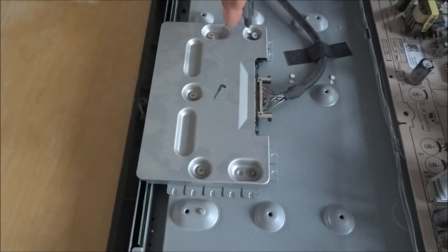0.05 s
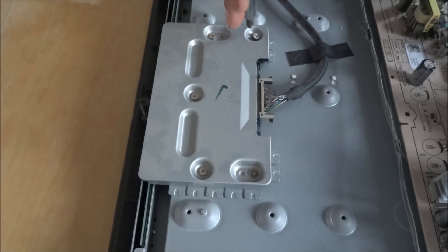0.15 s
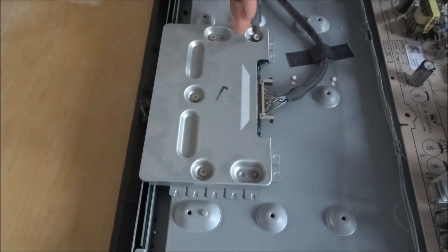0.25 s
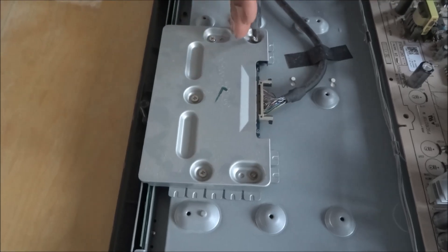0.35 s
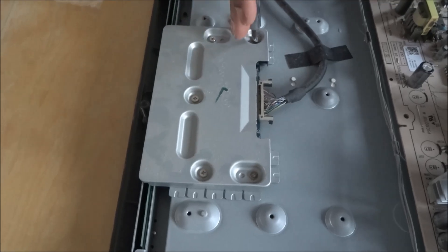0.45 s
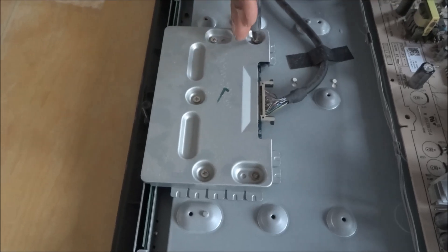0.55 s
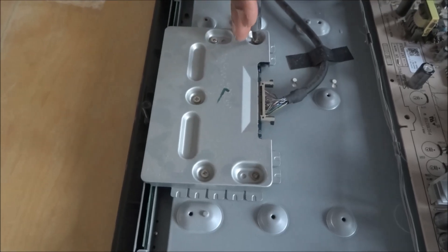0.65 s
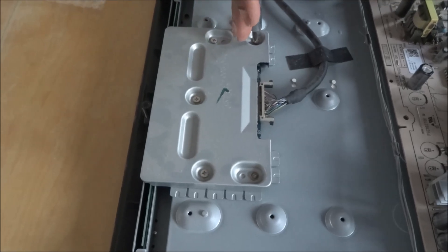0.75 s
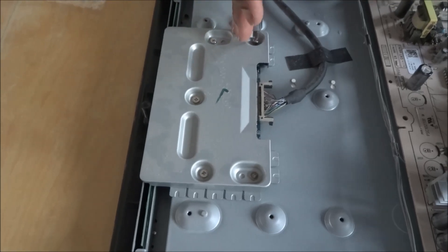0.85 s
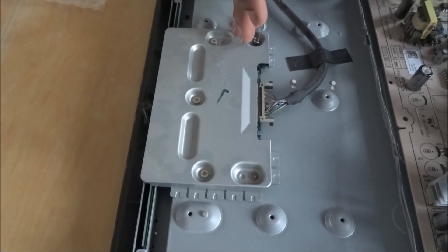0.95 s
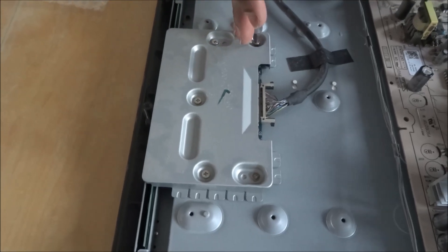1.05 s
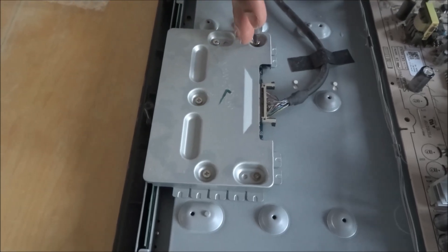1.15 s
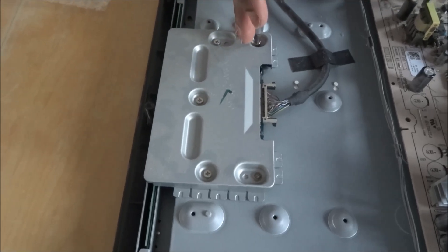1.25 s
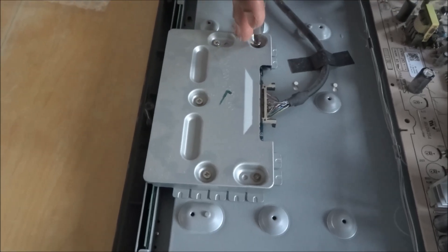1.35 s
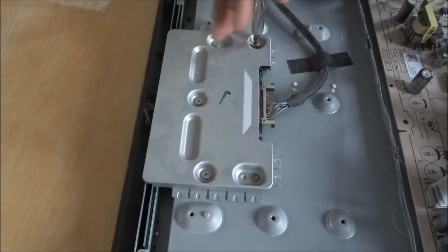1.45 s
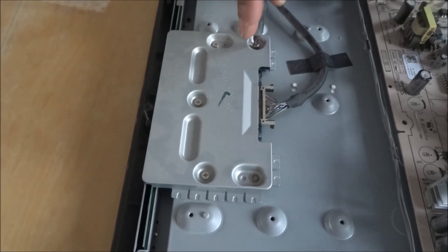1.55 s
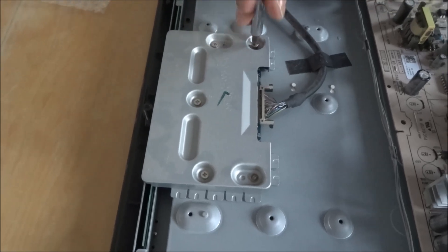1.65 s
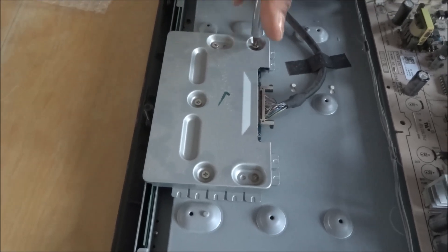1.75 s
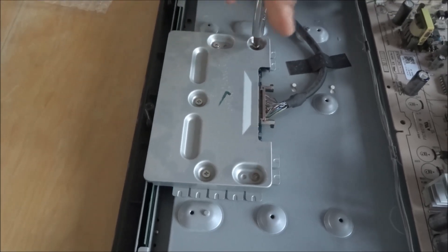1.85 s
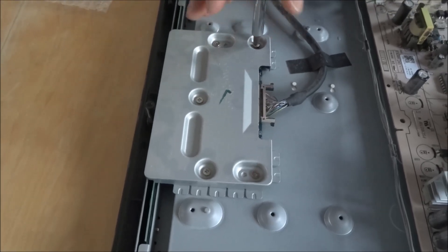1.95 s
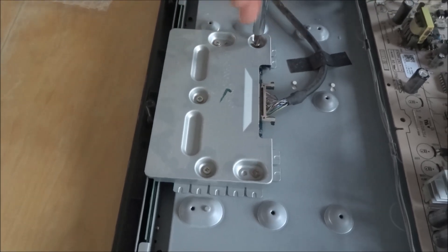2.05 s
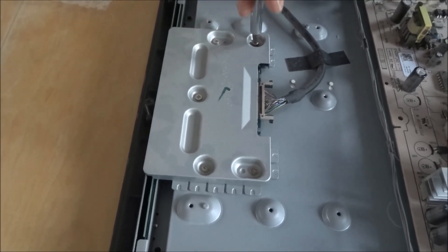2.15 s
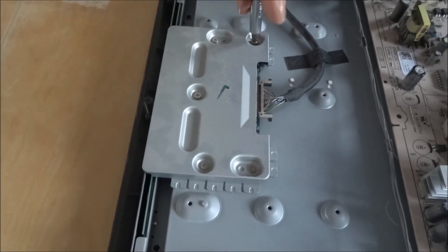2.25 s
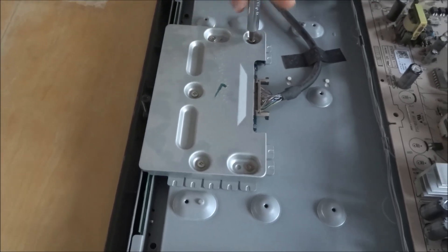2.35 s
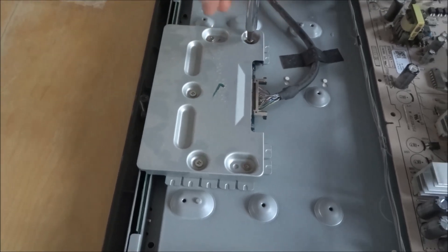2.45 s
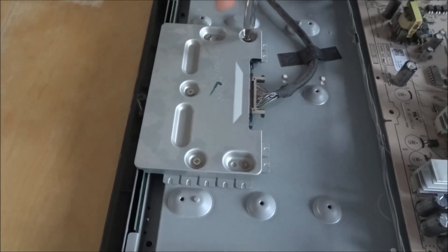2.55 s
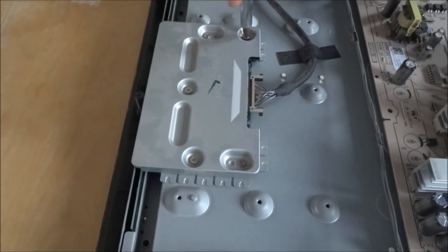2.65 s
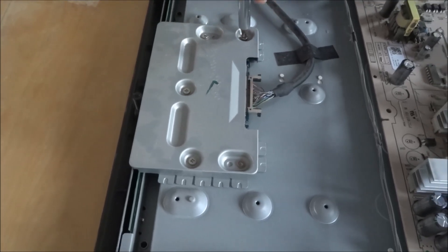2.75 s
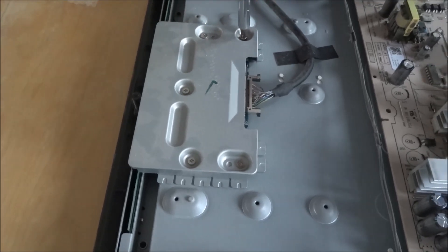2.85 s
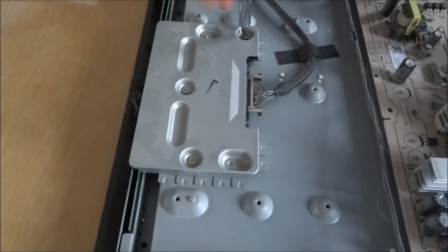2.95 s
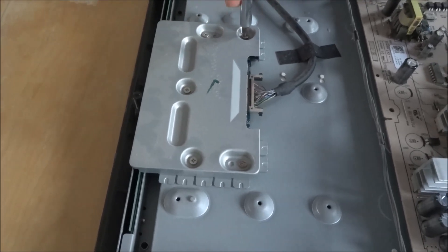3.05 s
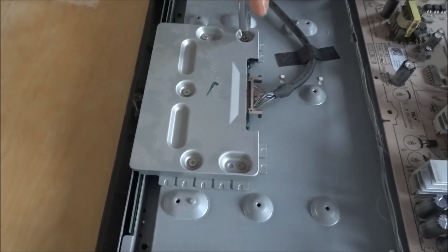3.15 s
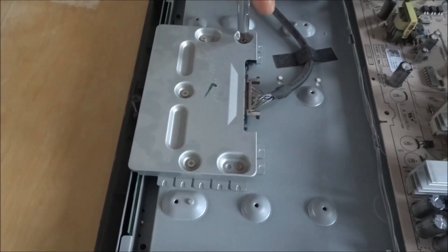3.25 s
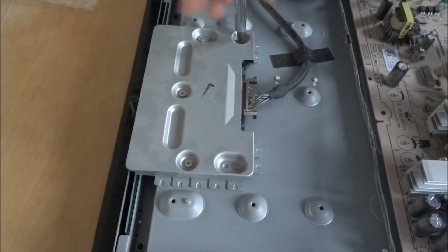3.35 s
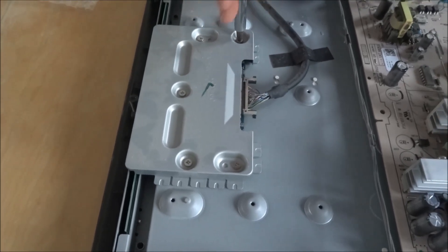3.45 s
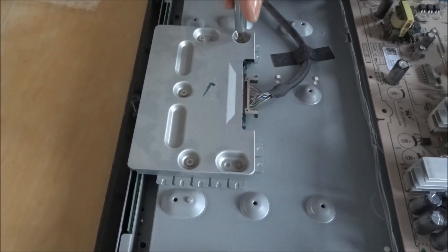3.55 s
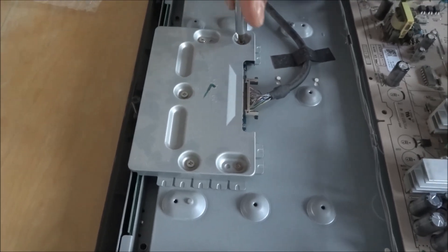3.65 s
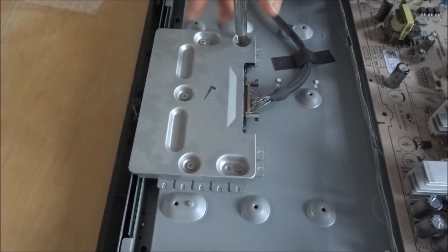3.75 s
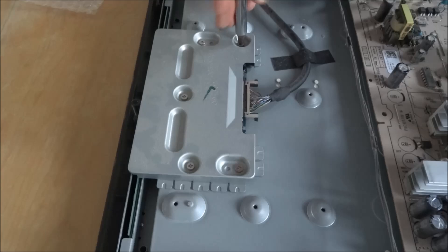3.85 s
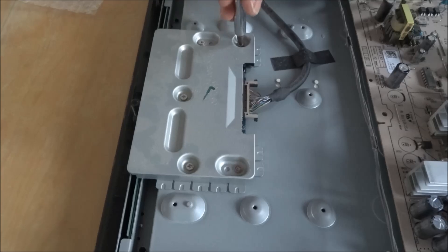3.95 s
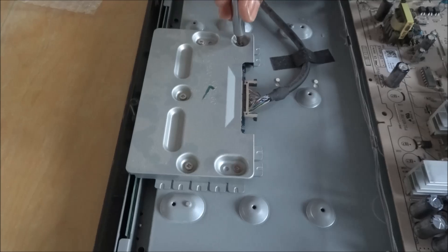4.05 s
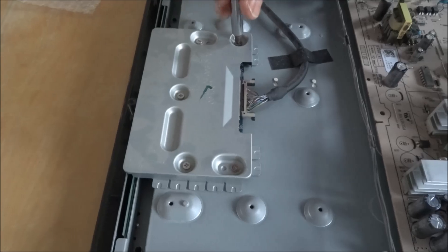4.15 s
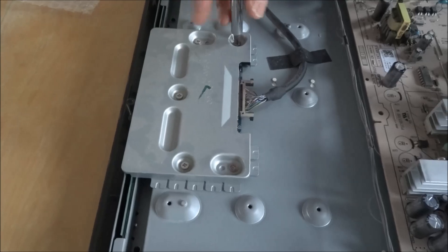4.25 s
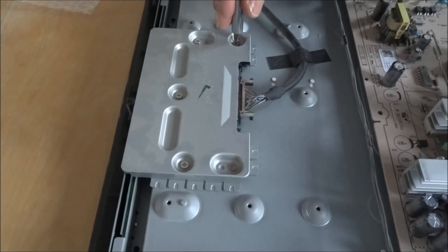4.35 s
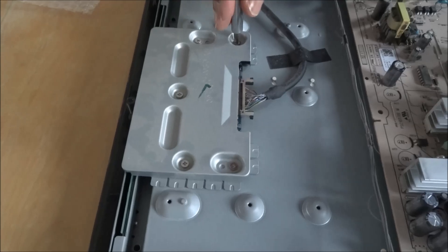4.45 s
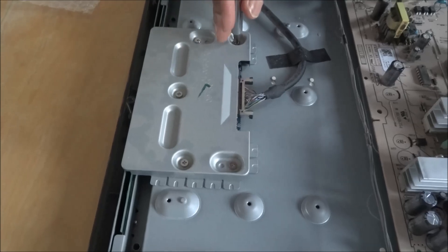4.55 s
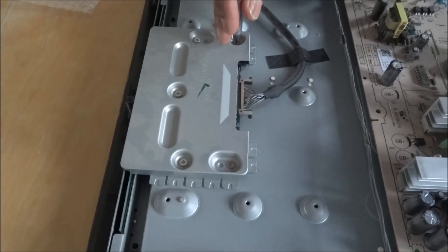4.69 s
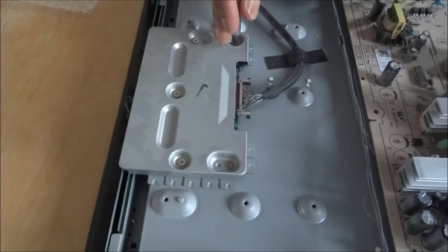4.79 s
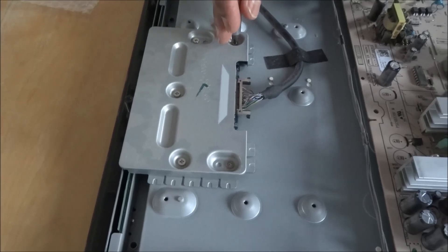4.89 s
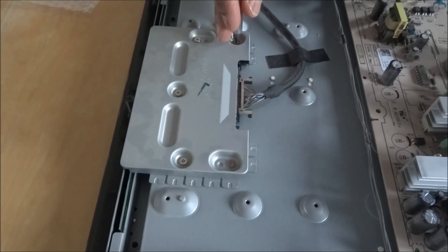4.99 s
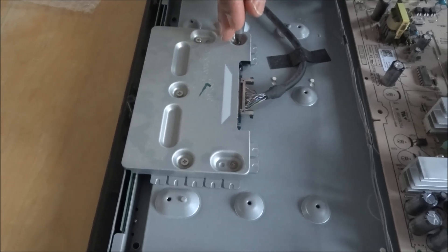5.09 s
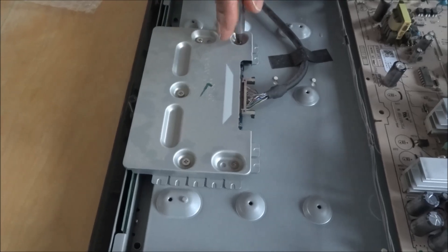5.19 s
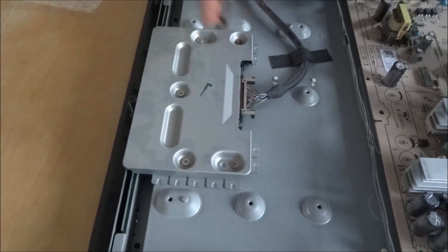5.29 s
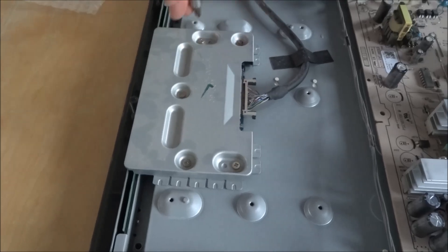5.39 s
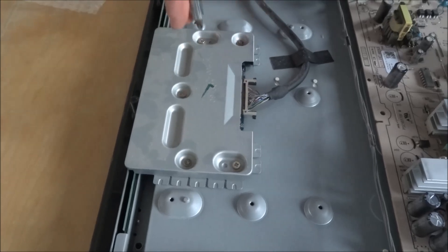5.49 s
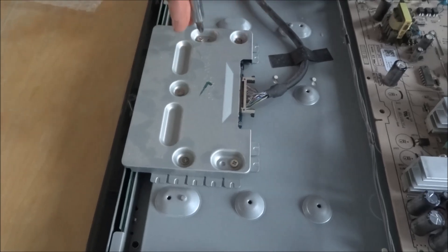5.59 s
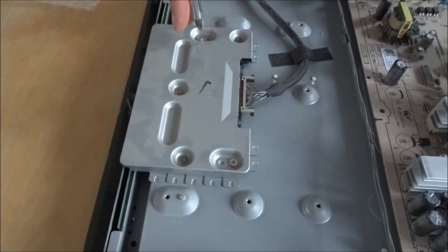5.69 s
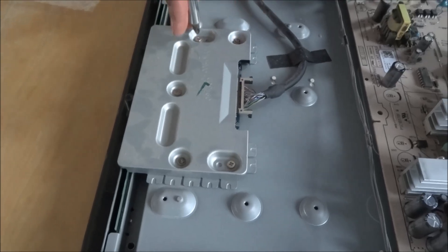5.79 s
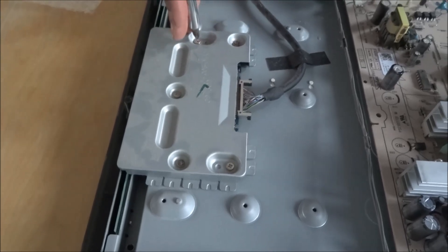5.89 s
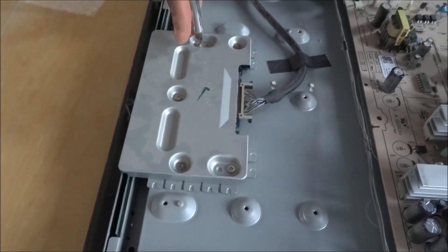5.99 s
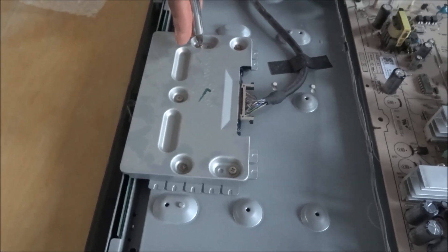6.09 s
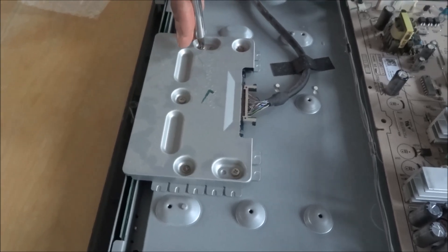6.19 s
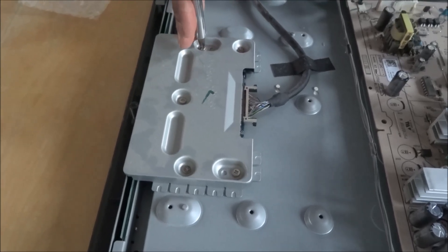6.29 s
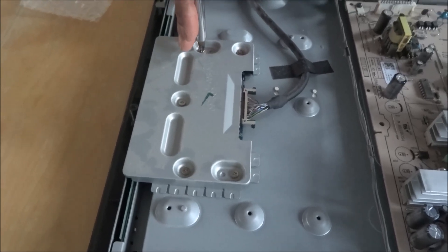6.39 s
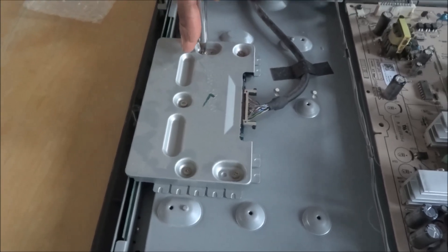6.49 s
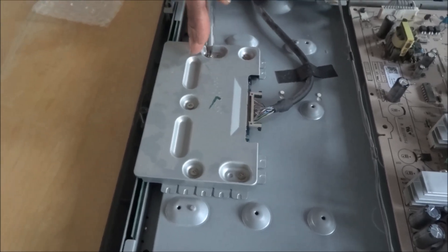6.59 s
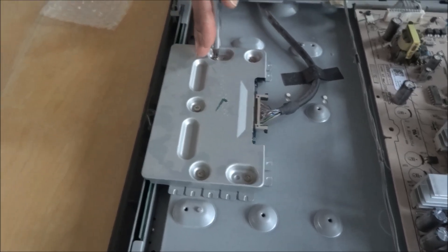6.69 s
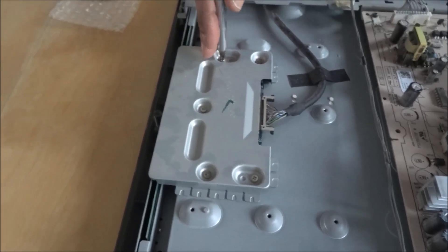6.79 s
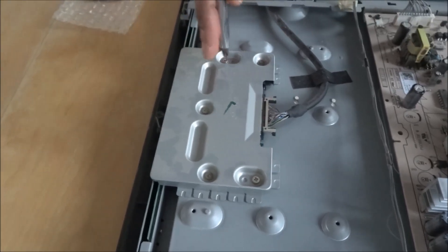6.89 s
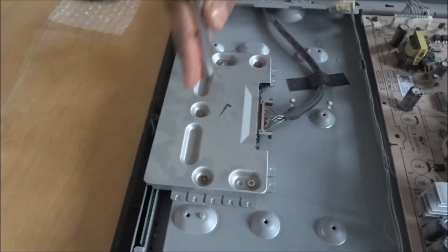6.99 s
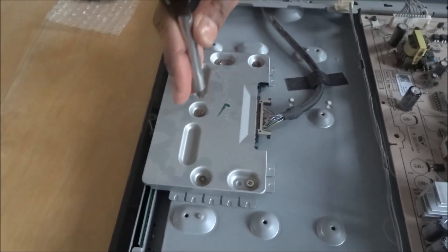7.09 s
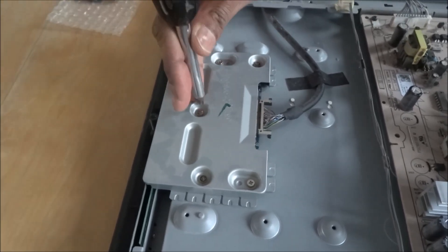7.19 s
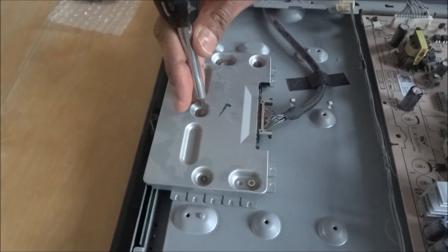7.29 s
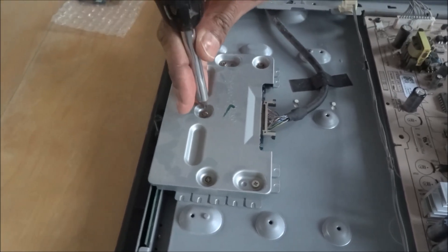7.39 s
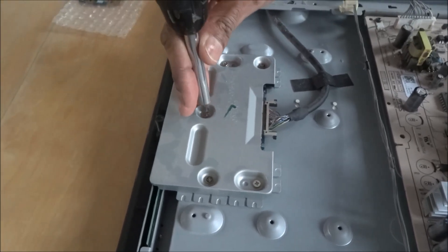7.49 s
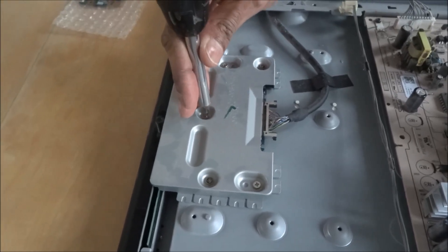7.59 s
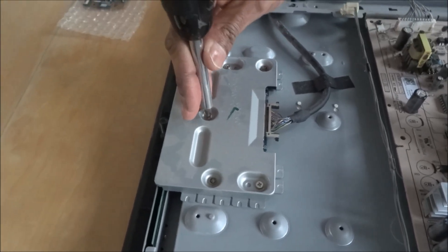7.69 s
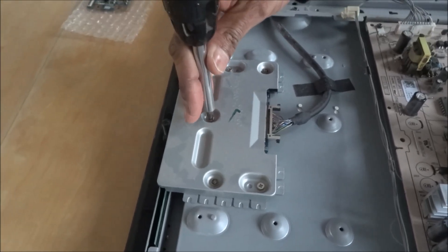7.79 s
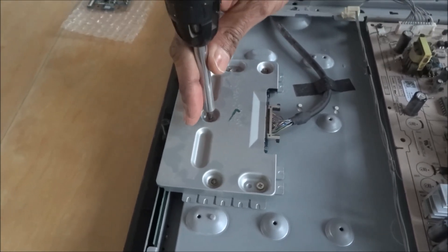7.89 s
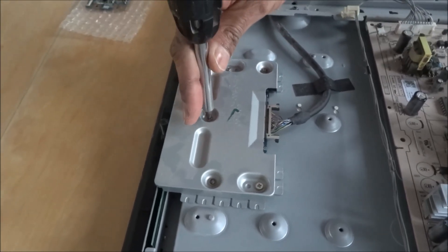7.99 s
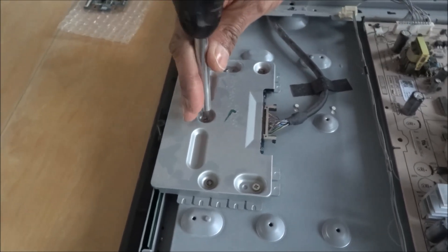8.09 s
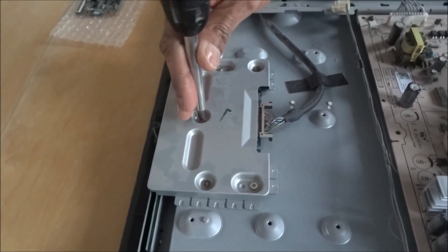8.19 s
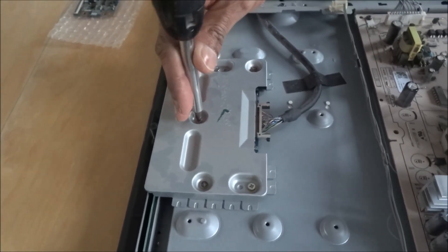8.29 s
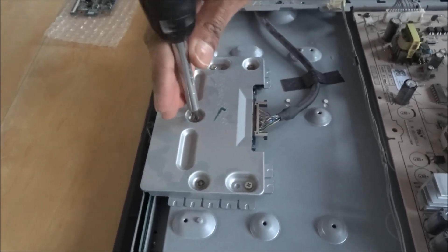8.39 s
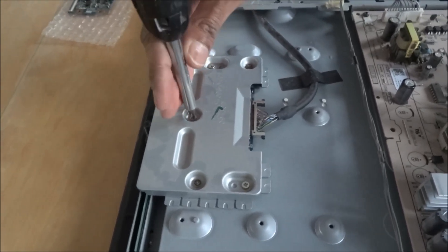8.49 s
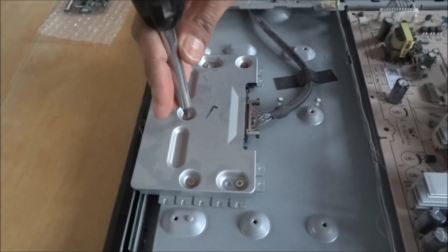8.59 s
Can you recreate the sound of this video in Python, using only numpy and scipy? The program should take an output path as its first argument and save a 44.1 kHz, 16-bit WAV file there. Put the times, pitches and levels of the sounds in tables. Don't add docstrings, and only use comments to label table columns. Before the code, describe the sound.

A hand ratchet screwdriver clicks in seven short runs, its steel bit ticking and clanking on thin metal over a low booming panel.

```python
import sys
import numpy as np
from scipy import signal
from scipy.fft import rfft, irfft, next_fast_len
from scipy.io import wavfile
from scipy.ndimage import uniform_filter1d

SR = 44100
rng = np.random.default_rng(int(sys.argv[2]) if len(sys.argv) > 2 else 0)


def wav_record(signal):
    frames = np.transpose(np.atleast_2d(signal))
    bounded = np.clip(frames, -1, 1)
    quanta = np.round(bounded * 32767).astype(np.int16)
    wavfile.write(sys.argv[1], SR, quanta)


def volts(x):
    e = np.asarray(x, float) / 20
    return 10 ** e


N = 381024
CUTOFF_HZ = 16600

# frequency in Hz, level in dB, t60 in seconds.
PAWL_MODES = [(2830, -6, .01), (3300, -10, .007), (4000, -17, .005), (5180, 1, .012), (5700, -3, .009),
              (6500, -3, .007), (7650, 5, .011), (8200, -5, .006), (9140, -7, .006), (10700, -5, .006),
              (11900, -8, .005)]
# frequency in Hz, level in dB, t60 in seconds.
PLATE_TREBLE_MODES = [(1870, -5, .02), (2150, -4, .025), (2350, -5, .02), (2800, -6, .018),
                      (3150, -6, .018), (3500, -9, .014)]
# frequency in Hz, level in dB, t60 in seconds.
PLATE_MIDDLE_MODES = [(635, -5, .04), (700, -7, .03), (775, -6, .035), (883, -9, .03), (1135, -9, .03),
                      (1550, -8, .03)]


def rms_one(x):
    return x / np.sqrt(np.mean(x ** 2) + 1e-20)


def at_hz(points, hz):
    points = np.array(points)
    return np.interp(np.log(hz), np.log(points[:, 0]), points[:, 1])


def blows(s, db, bounces_s, loss_db):
    delay = np.array(bounces_s) * rng.uniform(.7, 1.3, (len(s), len(bounces_s)))
    size = volts(np.asarray(db)[:, None] - loss_db * np.arange(len(bounces_s)))
    at = ((np.asarray(s)[:, None] + delay) * SR).astype(int)
    return np.minimum(at, N - 1), size


def strike(modes, at, size, spread_db, soft_hz):
    out = np.zeros((2, N))
    luck = rng.standard_normal(size.shape + (len(modes), 2))
    mode_db = np.array(modes)[:, 1]
    share = volts(spread_db * luck[..., 0] + mode_db)
    share *= np.linalg.norm(volts(mode_db)) / np.linalg.norm(share, axis=-1, keepdims=True)
    for k, (hz, db, t60) in enumerate(modes):
        force = np.full(N, 1e-18)
        np.add.at(force, at, size * share[..., k] * np.sign(luck[..., k, 1]))
        pole, w = volts(-60 / (t60 * SR)), 2 * np.pi * hz / SR
        rung = signal.lfilter([0, np.sin(w)], [1, -2 * pole * np.cos(w), pole * pole], force)
        out += rung * volts(.9 * (-1) ** k * np.array([[1], [-1]]))
    r = np.exp(-2 * np.pi * soft_hz / SR)
    return signal.lfilter([1 - r], [1, -r], out)


def crack(at, size, t60, low_hz, high_hz, apart_db):
    force = np.full(N, 1e-18)
    np.add.at(force, at, size)
    tail = signal.lfilter([1], [1, -volts(-60 / (t60 * SR))], force)
    mid, side = tail * rng.standard_normal((2, N))
    band = signal.butter(3, [low_hz, high_hz], "band", fs=SR, output="sos")
    return signal.sosfilt(band, volts(-2.5) * force + mid + volts(apart_db) * side * [[1], [-1]])


def scatter(x, spread_hz, rate_hz):
    drift = signal.lfilter(*signal.butter(2, rate_hz, fs=SR), rng.standard_normal(N))
    wander_hz = spread_hz * rms_one(drift)
    turning = np.exp(2j * np.pi * np.cumsum(wander_hz) / SR)
    return np.real(signal.hilbert(x, next_fast_len(N))[..., :N] * turning)


def coloured(spectrum):
    # frequency in Hz, likeness from 0 to 1.
    likeness = [(60, 0.98), (240, 0.99), (950, 0.6), (3770, 0.6), (15000, 1)]
    hz = np.maximum(np.fft.rfftfreq(N, 1 / SR), 1)
    mid, side = rfft(rng.standard_normal((2, N))) * volts(at_hz(spectrum, hz))
    alike = np.clip(at_hz(likeness, hz), 0, 1)
    return rms_one(irfft(np.sqrt(1 + alike) * mid + np.sqrt(1 - alike) * side * [[1], [-1]], N))


def background():
    # frequency in Hz, level in dB per Hz.
    hum_colour = [(20, -5), (40, -17.5), (80, -11), (130, -5), (200, -5), (300, -12.5), (1000, -22),
                  (3300, -42)]
    # frequency in Hz, level in dB per Hz.
    hiss_colour = [(880, -37), (1500, -10.5), (2160, -0.5), (2410, -2.5), (3000, -2), (4160, -7),
                   (10200, -9), (16000, -19)]
    # frequency in Hz, width in Hz, level relative to the hum in dB.
    standing_waves = [(157, 2.5, -6), (134.5, 4, -12), (190, 4, -14), (240, 5, -17)]
    # time in seconds, gain in dB.
    gain_curve = [(0, -6), (.8, -2.5), (1.6, 1), (2.1, -1.5), (3, -2.5), (3.999, -1.5), (4.8, -5),
                  (5.899, -5), (6.699, -1), (8.1, 0.5), (8.64, -2)]
    s, gain_db = np.transpose(gain_curve)
    hum_db = -39.5 + 0.62 * gain_db
    hiss_db = -52.5 + gain_db
    t, hum = np.arange(N) / SR, coloured(hum_colour)
    for hz, width_hz, db in standing_waves:
        r = np.exp(-np.pi * width_hz / SR)
        resonance = [1, -2 * r * np.cos(2 * np.pi * hz / SR), r * r]
        wave = signal.lfilter([1, 0, -1], resonance, rng.standard_normal(N))
        hum = hum + volts(db) * rms_one(wave)
    hiss = coloured(hiss_colour)
    return volts(np.interp(t, s, hum_db)) * hum + volts(np.interp(t, s, hiss_db)) * hiss


def appliance():
    first_s, every_s, on_s, mains_hz = .09, 1.061, .42, 99.9
    t = np.arange(N) / SR
    on = uniform_filter1d(1. * ((t - first_s) % every_s < on_s), size=1500)
    mains = volts(-41.5) * np.sin(2 * np.pi * mains_hz * t)
    octave = volts(-54) * np.sin(4 * np.pi * mains_hz * t)
    return on * (mains + octave)


def taps():
    # time in seconds, tick in dB, bluntness in dB
    bit_taps = [(0.5087, -36.5, 8.5), (0.5197, -26, -2), (0.9039, -27, 6), (0.922, -15, -10),
                (0.9344, -45, 3.5), (0.9847, -29.5, -12), (1.007, -28.5, -4), (1.0226, -28.5, -1.5),
                (1.0442, -27.5, -17), (1.067, -13, -2), (1.0729, -15, -1.5), (1.0894, -53, 1.5),
                (1.142, -34, -1.5), (1.1498, -21, -8), (1.1603, -15.5, -4), (1.188, -28, -15),
                (1.217, -33.5, -13), (1.249, -35, -10), (1.282, -36.5, -7.5), (1.3385, -7.5, 1.5),
                (1.6304, -15, -18),
                (1.915, -5.5, -14.5), (1.9872, -12, -6.5), (2.018, -14.5, -5), (2.092, -29, -16),
                    (2.11, -32, -7), (2.39, -16, -10), (2.4154, -3.5, -8.5), (2.4615, -21.5, 0.5),
                    (2.4954, -9, -7), (2.6296, -44, 14), (2.6469, -19, -4), (2.868, -28.5, 3),
                    (2.8843, -13.5, -9.5), (2.893, -15, -17), (3.0596, -25, -11.5), (3.3247, -18.5, -2),
                    (3.4685, -39.5, 4), (3.5547, -4, -18), (3.7943, -25.5, -10.5), (3.892, -39, -25),
                    (3.931, -36, -7.5), (3.943, -30, -2), (4.1915, -35.5, 8), (4.201, -12, -7),
                    (4.206, -13.5, -9.5), (4.3299, -27.5, -22), (4.336, -27, 6), (4.392, -24.5, -6.5),
                    (4.4422, -28, -14),
                (4.4878, -12, 0.5), (4.4944, -33, 15), (4.5005, -21, 5), (4.533, -19, -20),
                    (4.542, -12, -25), (4.7194, -47, 15.5), (4.749, -15, -16), (4.779, -26.5, -30),
                    (5.0654, -32.5, 1), (5.077, -9.5, -19), (5.111, -25, -14), (5.2587, -32, -7.5),
                    (5.289, -25.5, -22), (5.4177, -35, -9.5), (5.489, -33.5, -32), (5.7595, -47, 6.5),
                (6.079, -37.5, 18), (6.0924, -46, -9), (6.155, -44, 10), (6.1774, -36.5, 9.5),
                       (6.194, -32, 8.5), (6.2057, -16, 1.5), (6.3509, -12, -0.5), (6.3644, -49, 5),
                       (6.383, -35, 6), (6.575, -14.5, -5.5), (6.8728, -19.5, -4), (7.0074, -18, -44),
                       (7.553, -13.5, 2.5), (7.7225, -30, 10), (7.7381, -10.5, 2), (7.752, -28, -6),
                       (7.8404, -22.5, -6), (7.9287, -28, -11), (8.045, -35, -2), (8.08, -23, -37),
                       (8.444, -28.5, -2.5), (8.4645, -22, -3), (8.496, -19, -30), (8.528, -25, 0.5),
                       (8.5697, -35, -15), (8.607, -39.5, 7)]
    # time in seconds, peak in dB.
    play_knocks = [
        (1.6719, 2),
        (1.689, 3.5),
        (1.989, -7),
        (2.39, -12),
        (3.941, -19),
        (4.749, -6.5),
        (6.576, -30),
    ]
    # frequency in Hz, level in dB, t60 in seconds.
    shaft_modes = [(1140, -1, .03), (1278, 4, 0.028), (1335, 3, .025), (1380, 7, 0.032)]
    # time in seconds, peak in dB.
    shaft_clanks = [(0.517, -33), (0.932, -33), (1.022, -34), (1.067, -24), (1.0864, -32), (1.149, -30.5),
                    (1.1608, -29.5), (1.341, -15), (4.486, -17), (7.5534, -20.5), (7.724, -29.5),
                    (7.732, -19.5), (7.741, -12), (7.841, -25.5), (8.0448, -34), (8.5277, -32.5)]

    s, db, blunt_db = np.transpose(bit_taps)
    at, size = blows(s, db, [0, .0015, .004], loss_db=6)
    tick = crack(at, size, 0.0082, 2500, 11000, apart_db=-15.0)
    duller = signal.butter(2, 8500, fs=SR, output="sos")
    tick = signal.sosfilt(duller, tick)

    at, size = blows(s, db + 0.87 * blunt_db, [0, .002, .005], loss_db=6)
    treble = strike(PLATE_TREBLE_MODES, at, size * volts(-2.1), spread_db=7.5, soft_hz=8250)
    treble += crack(at, size * volts(3.5), 0.019, 940, 4890, apart_db=-16.5)

    at, size = blows(s, db + 1.53 * blunt_db, [0, .003, .008], loss_db=9.5)
    middle = strike(PLATE_MIDDLE_MODES, at, size * volts(-7.0), spread_db=-3.0, soft_hz=5000)
    middle += crack(at, size * volts(-0.5), 0.12, 250, 1600, apart_db=-16.5)

    s, db = np.transpose(play_knocks)
    at, size = blows(s, db, [0, .002], loss_db=3)
    knocks = strike(PAWL_MODES[:2], at, size, spread_db=3.0, soft_hz=9000)
    s, db = np.transpose(shaft_clanks)
    at, size = blows(s, db + 1.5, [0, .004], loss_db=23.0)
    clanks = strike(shaft_modes, at, size, spread_db=2.5, soft_hz=5040)
    return tick + knocks + treble + middle + clanks


def loads():
    # time in seconds, boom in dB, upper panel modes in
    # relative dB, bench in relative dB.
    panel_pushes = [(0.519, -16, -3, -16.5), (0.908, -11.5, -11, -8), (.937, -18.5, -1, -10.5),
                    (1.006, -17.5, -10, -4), (1.071, -14.5, -1.5, -7), (1.146, -17, -1, -0.5),
                    (1.168, -9.5, -14, -27.5), (1.3, -26, -8, 0.5), (1.35, -8.5, -4.5, -12),
                    (1.639, -42.5, -3, -4), (1.665, -12.5, -1.5, -8), (4.192, -15, -10.5, -4.5),
                    (4.334, -14, -20, -11), (4.444, -44, 4, -6.5), (4.487, -12, 2.5, -9.5),
                    (4.503, -0.5, -10, -12), (4.746, -22, -9, -37), (4.973, -28, -12, -6),
                    (5.084, -25, -4, -3), (5.259, -22, -13, -4), (5.376, -30.5, -22.5, 2),
                    (6.079, -10, -4.5, -15), (6.092, -17, 0.5, -30), (6.189, -16, 2, -15),
                         (6.351, -8.5, -1.5, -25), (6.365, -26.5, 4.5, -29), (6.532, -23, -7, -8),
                         (6.571, -24.5, 0.5, -2.5), (6.871, -32.5, -0.5, -9), (7.551, -12.5, -3.5, -26),
                         (7.723, -15.5, 1.5, -22), (7.747, -10, 3, -13.5), (7.841, -8, -18.5, -8.5),
                         (8.445, -20, -3, -14), (8.53, -24, 8, -2.5)]
    # time in seconds, boom in dB, boom t60 in seconds.
    hand_leans = [
        (1.924, -18.5, 0.4),
        (2.217, -23, 0.44),
        (2.398, -19.5, 0.45),
        (2.768, -25.5, 0.79),
        (2.868, -21.5, 0.3),
        (3.206, -24, 0.59),
        (3.249, -21.5, 0.4),
        (3.558, -24, 0.34),
        (3.657, -19.5, 0.37),
        (3.949, -25, 0.26),
    ]
    # start in seconds, favoured upper mode in Hz, boom t60 in seconds.
    bit_places = [
        (0, 316, 0.25),
        (1.05, 265, 0.48),
        (4.1, 387, 0.31),
        (5.9, 311, 0.27),
        (7.3, 379.6, 0.15),
    ]
    from_s, place_hz, place_t60 = np.transpose(bit_places)
    leaning = [(s, db, -5, -40.5) for s, db, _ in hand_leans]
    s, db, upper_db, bench_db = np.transpose(panel_pushes + leaning)
    place = np.maximum(np.searchsorted(from_s, s) - 1, 0)
    t60 = np.append(place_t60[place][:-len(hand_leans)], np.transpose(hand_leans)[-1])
    favoured_hz = place_hz[place] * np.exp(.1 * rng.standard_normal(len(s)))
    return s, db, upper_db, bench_db, favoured_hz, t60


def pushes():
    # frequency in Hz, level in dB, t60 in seconds.
    panel_modes = [(303, -7, .1), (345, -8, .055), (385, -7, .055), (435, -6, .06), (470, -9, .05),
                   (540, -9, .05)]
    # frequency in Hz, level in dB, t60 in seconds.
    bench_modes = [(76, -28, 0.19), (135, -3, 0.3), (156, -20, 0.19)]
    # frequency in Hz, level in dB, t60 in seconds.
    flank_modes = [(210.7, -46, 0.18), (236.2, -10, 0.38)]
    boom_hz, lead_rad = 215.9, 0.033
    s, db, upper_db, bench_db, place_hz, t60 = loads()
    t, power = np.arange(N) / SR, np.zeros(N)
    for start, top, ring in zip(s, volts(db + 2.0), t60):
        i, age, rise = int(start * SR), t[:SR], 0.0034 / np.sqrt(top)
        swell = top * (1 - np.exp(-age / rise)) * volts(-60 * age / ring)
        power[i:i + SR] += (swell ** 2)[:N - i]
    boom = np.sqrt(power) * np.sin(2 * np.pi * boom_hz * t + lead_rad * np.array([[1], [-1]]))

    at, size = blows(s, db, [0], loss_db=0)
    flanks = strike(flank_modes, at, size, spread_db=-17.0, soft_hz=298)

    at, size = blows(s, db + upper_db, [0, .009], loss_db=3.5)
    upper = crack(at, size, 0.093, 200, 1110, apart_db=-27.5)
    for mode in panel_modes:
        near = volts(-16 * np.abs(np.log2(mode[0] / place_hz)))[:, None]
        force = size * near * volts(rng.normal(5.8, 2.9, size.shape))
        upper = upper + strike([mode], at, force, spread_db=0, soft_hz=1510).mean(axis=0)

    at, size = blows(s, db + bench_db + 0.5, [.004], loss_db=0)
    bench = strike(bench_modes, at, size, spread_db=-3.5, soft_hz=608)
    return boom, flanks + upper + bench


def scrapes():
    # start in seconds, length in seconds, level in dB.
    slides = [(0.909, 0.045, -31.5), (0.998, 0.036, -53), (1.049, 0.025, -35), (1.965, 0.045, -35.5),
              (2.401, 0.12, -36), (1.141, 0.038, -39), (1.349, .1, -43), (2.622, 0.053, -40.5),
              (3.07, 0.014, -45), (3.497, 0.013, -46), (4.317, 0.044, -33.5), (4.497, 0.045, -40),
              (6.171, .09, -36), (6.853, 0.036, -40), (7.223, 0.078, -53.5), (7.701, 0.056, -35.5),
              (8.039, 0.098, -42), (8.428, 0.03, -38.5), (8.462, 0.16, -48.5), (2.855, 0.044, -42),
              (4.188, 0.038, -34)]
    t, level = np.arange(N) / SR, np.zeros(N)
    for start, length, db in slides:
        level += volts(db) * np.sin(np.pi * np.clip((t - start) / length, 0, 1)) ** 2
    slips_per_s = 1500
    at = np.flatnonzero((rng.random(N) < slips_per_s / SR) & (level > 1e-9))
    size = level[at] * volts(0.74 * np.minimum(rng.exponential(1, N)[at], 5))
    modes = PLATE_TREBLE_MODES + PLATE_MIDDLE_MODES
    plate = strike(modes, at, size * volts(-2.0), spread_db=9.0, soft_hz=7000)
    return plate + crack(at, size * volts(-12.5), 0.023, 700, 13000, apart_db=-15.5)


def rings():
    # time in seconds, frequency in Hz, peak in dB, t60 in seconds.
    ringing_modes = [(0.911, 430, -26, 0.1), (1.17, 304, -19, .15), (1.338, 1524, -8, 0.021),
                     (1.339, 2300, -10, 0.014), (1.339, 3580, -17, 0.013), (1.351, 304, -16, .2),
                     (1.351, 435, -21, .12), (1.667, 306.4, -25, 0.17), (2.415, 442, -25.5, 0.16),
                     (2.4155, 5060, -6, .012), (2.4156, 1400, -21, 0.019), (4.325, 60.4, -24, 0.21),
                     (4.39, 1140, -33, 0.034), (4.487, 1245, -8, .02), (4.494, 1470, -7.5, 0.026),
                     (4.495, 3130, -16.5, .015), (4.505, 307, -13.5, 0.16), (4.505, 460, -20.5, 0.12),
                     (5.259, 292, -22.5, .1), (5.759, 2120, -34, 0.02), (5.759, 2830, -38, .02),
                     (6.082, 300, -27.5, .15), (6.082, 437, -20, .12), (6.092, 136.5, -29, 1),
                     (6.353, 309, -19, 0.16), (6.3653, 329, -9.5, 0.042), (6.0928, 342, -13.5, 0.044),
                     (7.553, 415.7, -9.5, 0.089), (7.555, 342, -12, 0.11), (7.554, 2290, -17, 0.027),
                     (7.552, 1350, -12, .02), (7.556, 1362, -28.5, .2), (7.562, 133.4, -25, 0.94),
                     (7.739, 2276, -19, .05), (7.741, 390, -6, .12), (7.745, 1387, -31.5, .2),
                     (7.745, 1290, -30, .2), (7.753, 2355, -18.5, .05), (7.841, 422, -6, 0.092),
                     (7.8418, 340, -8, 0.12), (7.841, 2290, -27.5, .04), (8.43, 52, -29.5, .3)]
    out = np.zeros(N + SR)
    for s, hz, db, t60 in ringing_modes:
        start = int(s * SR)
        age = np.arange(min(int(t60 * SR), SR)) / SR
        out[start:start + len(age)] += volts(db - 60 * age / t60) * np.sin(2 * np.pi * hz * age)
    return out[:N]


def squeaks():
    # start in seconds, length in seconds, frequency in Hz, level in dB.
    rubs = [(0.937, .03, 618, -33), (1.067, 0.071, 762, -25), (1.145, 0.039, 420, -19.5),
            (1.285, 0.092, 662, -33.5), (4.486, 0.016, 680, -10), (4.488, 0.045, 787, -18.5),
            (4.49, 0.029, 1153, -22), (5.071, 0.033, 756, -35.5), (5.745, 0.027, 1780, -50),
            (7.564, 0.057, 768, -23), (8.066, .05, 2200, -47)]
    t, out = np.arange(N) / SR, np.zeros(N)
    for start, length, hz, db in rubs:
        swell = np.sin(np.pi * np.clip((t - start) / length, 0, 1))
        out += volts(db) * swell * np.sin(2 * np.pi * hz * t)
    return scatter(out, spread_hz=25.2, rate_hz=64.0)


def teeth():
    # time in seconds, teeth per second.
    wrist_strokes = [
        [(1.6507, 85), (1.6981, 127), (1.7266, 80), (1.7793, 150), (1.8078, 59), (1.8441, 50)],
        [(2.1496, 61), (2.2167, 118), (2.2542, 96), (2.3055, 22)],
        [(2.6646, 44), (2.6924, 99), (2.712, 105), (2.7441, 145), (2.7887, 33)],
        [(3.0825, 76), (3.1188, 88), (3.1378, 125), (3.1731, 100), (3.2006, 117), (3.2236, 58)],
        [(3.5104, 53), (3.5881, 153), (3.6027, 120), (3.6288, 110), (3.6417, 46), (3.6824, 3)],
        [(3.9674, 85), (3.9947, 61), (4.0271, 62), (4.0904, 33)],
        [(4.5483, 28), (4.5835, 28)],
    ]
    stroke_levels = [-5.5, -5, -6, -7, -5.5, -6, -7.5]
    last_tooth_levels = [1.5, -3, -3, 1.5, 0, 1, -3.5]
    rows = []
    for stroke, level_db, last_db in zip(wrist_strokes, stroke_levels, last_tooth_levels):
        s, speed = np.transpose(stroke)
        t = np.linspace(s[0], s[-1], num=2000)
        turned = np.cumsum(np.interp(t, s, speed)) * (t[1] - t[0])
        tooth = np.linspace(turned[0], turned[-1], round(turned[-1]) + 1)
        when = np.interp(tooth, turned, t)
        slow = np.log2(100 * np.gradient(when))
        db = level_db + last_db * (when == when[-1])
        db = db + 1.1 * slow + 1.6 * rng.standard_normal(len(when))
        rows += zip(when, db, slow)
    return np.transpose(rows)


def ratchet():
    # time in seconds, low housing modes in dB, middle modes in dB.
    finger_grip = [(1.65, -10.5, 2), (1.69, 6.5, -2), (1.73, -8, -9.5), (1.775, -2, 1.5), (1.845, 0, 0.5),
                   (2.15, -4.5, -5.5), (2.19, 2.5, 3.5), (2.235, -1, -3), (2.305, -25.5, -6),
                   (2.665, -6, -8), (2.7, 0.5, 3.5), (2.73, 1, 1), (2.765, 0, 0.5), (2.79, -9.5, -9),
                   (3.082, -0.5, -5), (3.135, 2, -4.5), (3.16, -3, 1.5), (3.2, 0.5, -8.5),
                   (3.224, -2.5, -6), (3.51, 0, -13), (3.57, -0.5, -2.5), (3.62, -3, -2), (3.68, 1.5, -7),
                   (3.967, -3.5, 0.5), (4.03, -4.5, -7), (4.09, -4, -1), (4.548, -1.5, -0.5),
                   (4.584, 1.5, 3)]
    grip_hz, middle_hz = 3800, 6000
    alike = .6
    s, db, slow = teeth()
    held_s, low_db, middle_db = np.transpose(finger_grip)
    grip_db, middle_db = np.interp(s, held_s, low_db), np.interp(s, held_s, middle_db)
    at, size = blows(s, 0 * db, [0, .0006, .0013], loss_db=4.5)
    size = size * volts(-3.5 * np.maximum(slow, 0)[:, None] * np.arange(size.shape[1]))

    hz, mode_db, t60 = np.transpose(PAWL_MODES)[:, :, None]
    age = np.arange(600) / SR
    luck = rng.standard_normal(at.shape + (len(PAWL_MODES), 3))
    luck[..., :2] = signal.lfilter([np.sqrt(1 - alike ** 2)], [1, -alike], luck[..., :2], axis=0)
    mode_db = mode_db + grip_db[:, None, None, None] * (hz < grip_hz)
    mode_db = mode_db + middle_db[:, None, None, None] * ((hz > grip_hz) & (hz < middle_hz))
    shifted_hz = hz * (1 + 0.014 * luck[:, :1, :, :1])
    envelope = volts(mode_db + 2.85 * luck[..., 1:2] - 60 * age / t60)
    modes = envelope * np.sign(luck[..., 2:]) * np.sin(2 * np.pi * shifted_hz * age)
    housing = np.zeros((2, N))
    for side, lean_db in enumerate((1.3, -1.3)):
        lean = volts(lean_db * (-1) ** np.arange(len(PAWL_MODES)))[:, None]
        heard = size[..., None] * volts(-12.5) * np.sum(modes * lean, axis=2)
        np.add.at(housing[side], at[..., None] + np.arange(len(age)), heard)

    noise_db = -13.5 + 2.5 * np.clip(slow, 0, 2)
    snap = housing + crack(at, size * volts(noise_db)[:, None], 0.009, 4600, 10900, apart_db=-18)
    snap += crack(at, size * volts(grip_db - 12)[:, None], 0.012, 2110, 4600, apart_db=-40.5)
    snap += crack(at, size * volts(-21), .012, 8000, 14500, apart_db=-3)
    first = at[:, 0]
    top = np.maximum.reduceat(np.abs(snap.mean(axis=0)), first)
    latest = np.maximum(np.searchsorted(first, np.arange(N), "right") - 1, 0)
    snap = snap * (volts(db + 6.0) / top)[latest]
    snap += crack(first - round(.0022 * SR), volts(db - 37.5), .02, 4000, 12000, apart_db=-16)
    return snap + crack(at, size * volts(db - 39.0)[:, None], 0.32, 410, 4400, apart_db=-55.5)


def far_motor():
    # time in seconds, frequency in Hz, level in dB.
    winding_down = [
        (5.28, 277, -75),
        (5.358, 283, -45),
        (5.5, 264, -42.5),
        (5.65, 236, -48),
        (5.851, 230, -76),
    ]
    s, hz, db = np.transpose(winding_down)
    t = np.arange(N) / SR
    phase = 2 * np.pi * np.cumsum(np.interp(t, s, hz)) / SR
    return volts(np.interp(t, s, db, -120, -120)) * np.sin(phase)


def room(x, alike, build_s):
    # frequency in Hz, t60 in seconds.
    room_decay = [(100, 0.76), (1000, 0.35), (3000, 0.29), (8000, 0.27), (16000, 0.14)]
    t, echo = np.arange(SR // 2) / SR, 0
    edges = np.append(50.4 * 2. ** np.arange(9), CUTOFF_HZ)
    for low, high in zip(edges, edges[1:]):
        band = signal.butter(2, [low, high], "band", fs=SR, output="sos")
        decay = volts(-60 * t / at_hz(room_decay, np.sqrt(low * high)))
        echo = echo + signal.sosfilt(band, rng.standard_normal((3, len(t)))) * decay
    echo = echo * (1 - np.exp(-t / build_s))
    return signal.fftconvolve(x[None], alike * echo[0] + echo[1:], axes=1)[:, :N]


def shadowed(x):
    # frequency in Hz, width in Hz, depth from 0 to 1.
    plate_dips = [(1010, 220, .5), (4300, 600, .45)]
    for hz, width_hz, depth in plate_dips:
        x = x - depth * signal.lfilter(*signal.iirpeak(hz, hz / width_hz, fs=SR), x)
    return x


def scene():
    tool = ratchet() * volts(np.array([[-.3], [.3]]))
    work = (taps() + scrapes() + squeaks() + rings()) * volts(np.array([[.1], [-.1]]))
    boom, thuds = pushes()
    low = (boom + thuds) * volts(np.array([[.4], [-.4]]))
    wet = volts(-52.0) * scatter(tool, spread_hz=500, rate_hz=900)
    wet += volts(-54.0) * scatter(work, spread_hz=260, rate_hz=350)
    wet += volts(-52.0) * scatter(thuds, spread_hz=69.95, rate_hz=80)
    walls = room(wet.mean(axis=0), alike=5.35, build_s=0.0025)
    return shadowed(tool + work + low + walls) + background() + far_motor() + appliance()


def top_cut(x):
    return signal.sosfilt(signal.butter(12, 16650, fs=SR, output="sos"), x)


def record(dry):
    rounded = 0.96 * np.tanh(dry / 1.234)
    x = signal.sosfilt(signal.butter(3, 45, "high", fs=SR, output="sos"), rounded)
    x = signal.sosfilt(signal.cheby2(12, 60, CUTOFF_HZ, fs=SR, output="sos"), x)
    return top_cut(np.clip(x, -1, 1))


dry = scene()
out = record(dry)
wav_record(out)
```